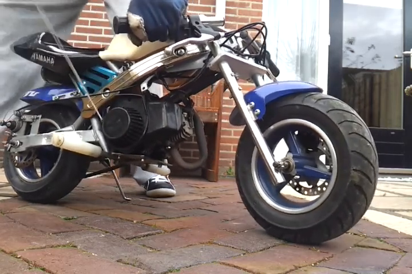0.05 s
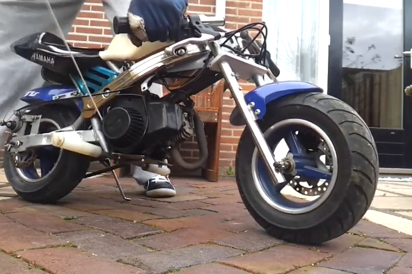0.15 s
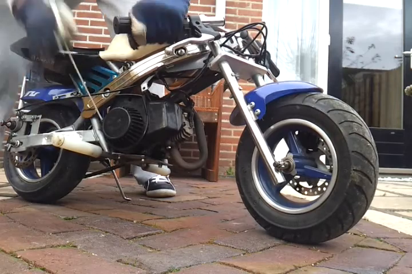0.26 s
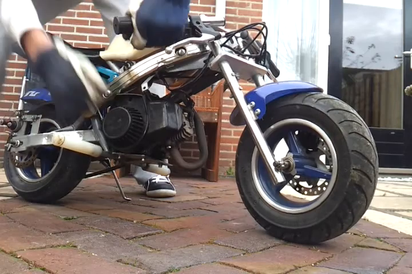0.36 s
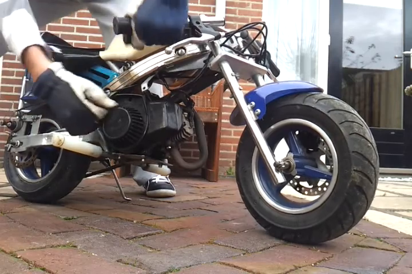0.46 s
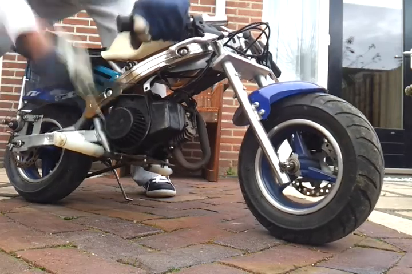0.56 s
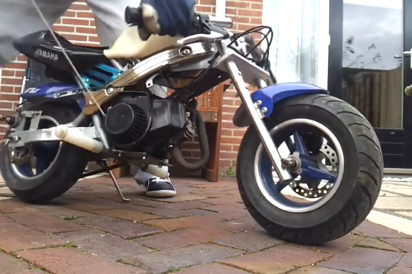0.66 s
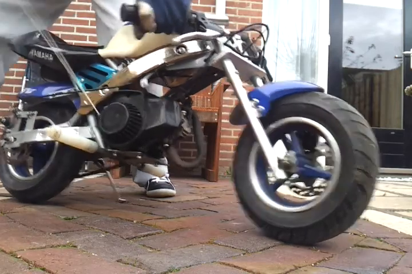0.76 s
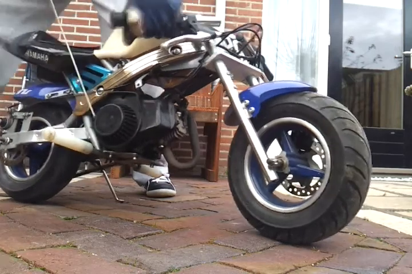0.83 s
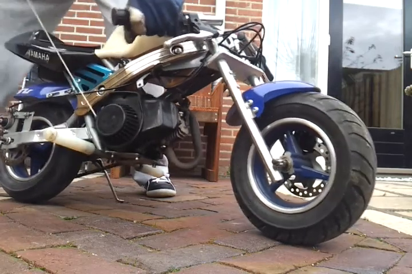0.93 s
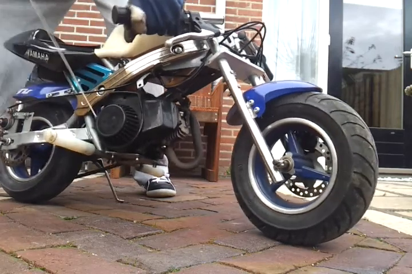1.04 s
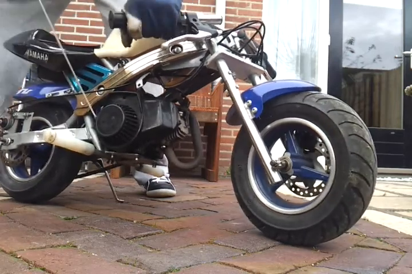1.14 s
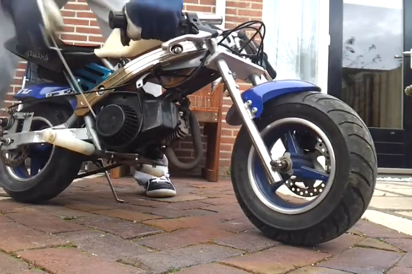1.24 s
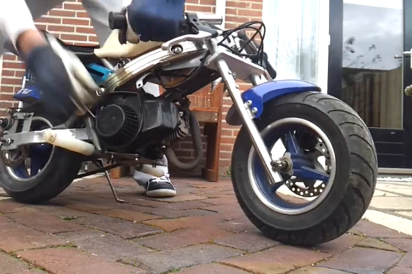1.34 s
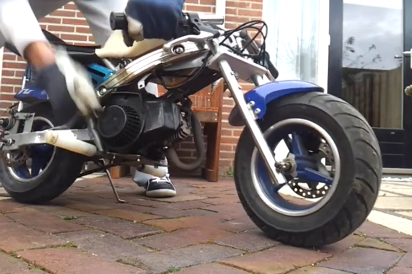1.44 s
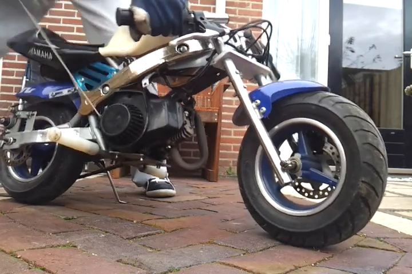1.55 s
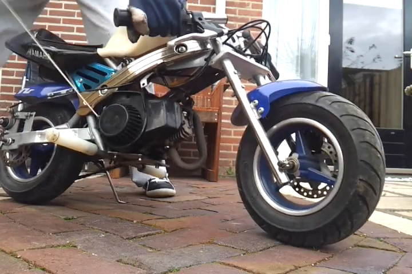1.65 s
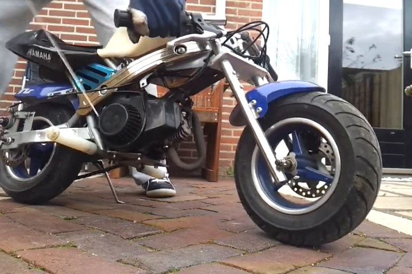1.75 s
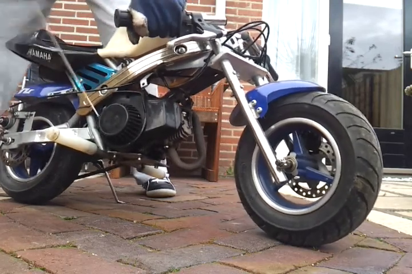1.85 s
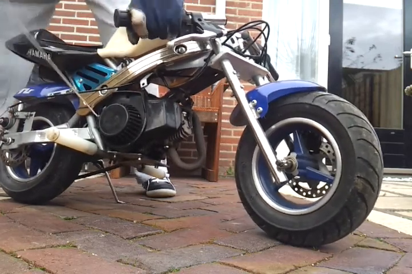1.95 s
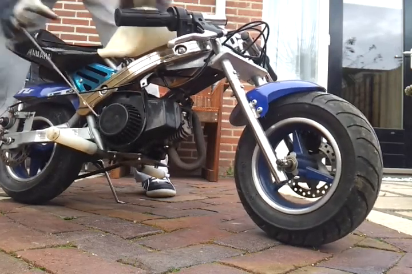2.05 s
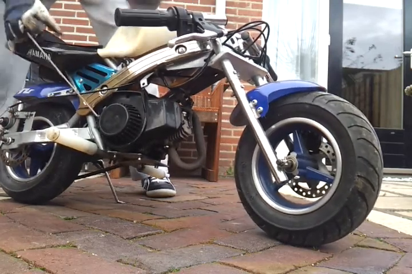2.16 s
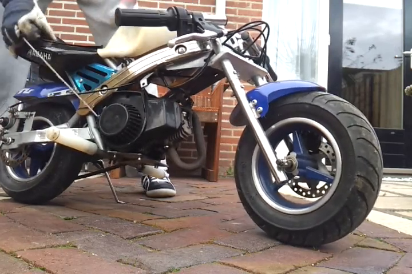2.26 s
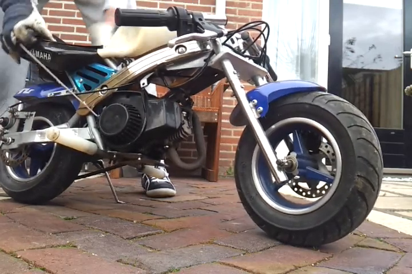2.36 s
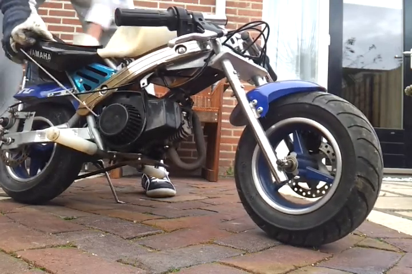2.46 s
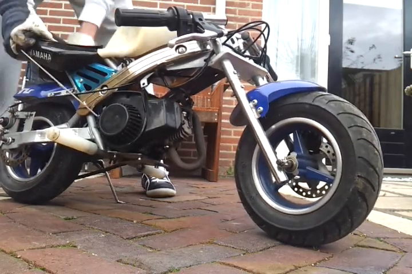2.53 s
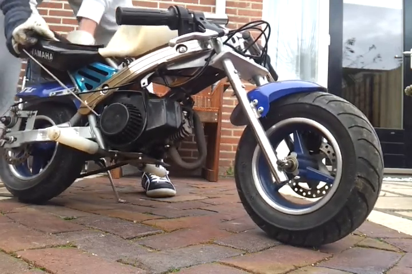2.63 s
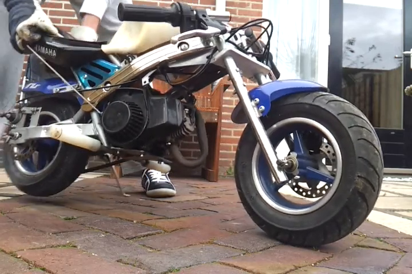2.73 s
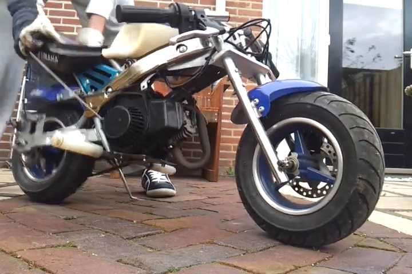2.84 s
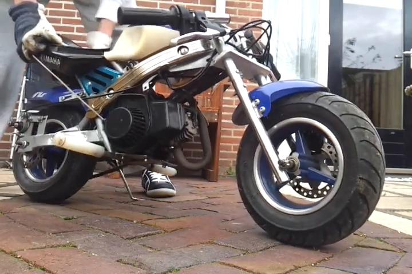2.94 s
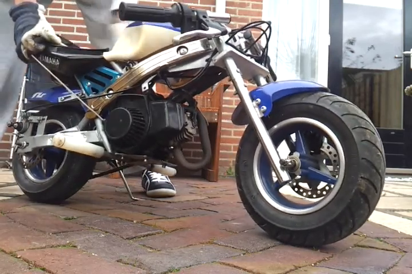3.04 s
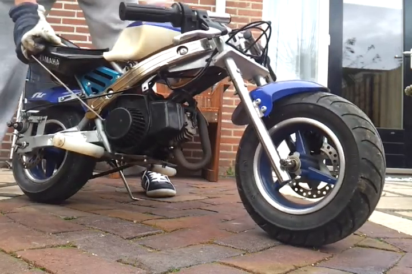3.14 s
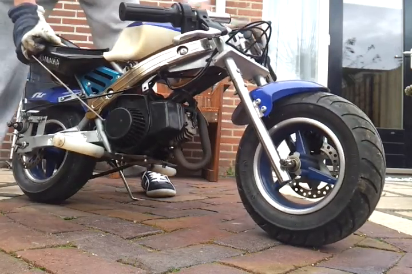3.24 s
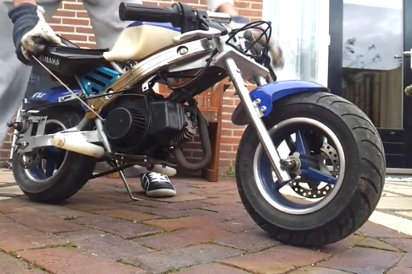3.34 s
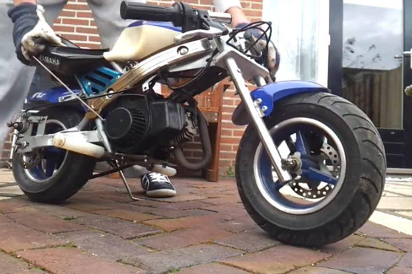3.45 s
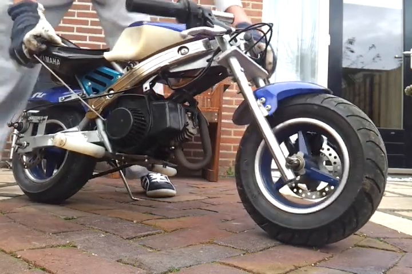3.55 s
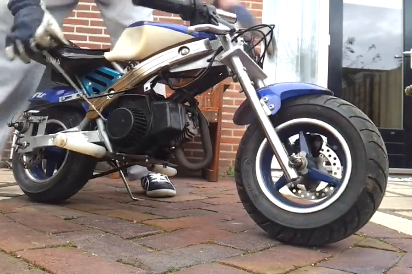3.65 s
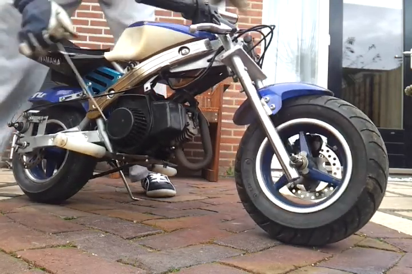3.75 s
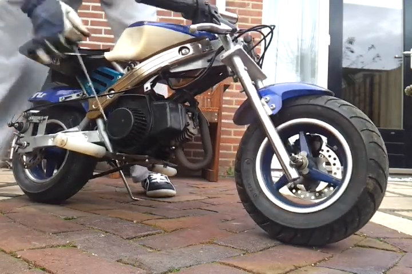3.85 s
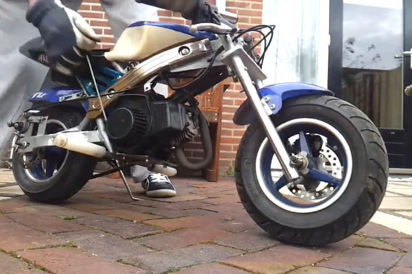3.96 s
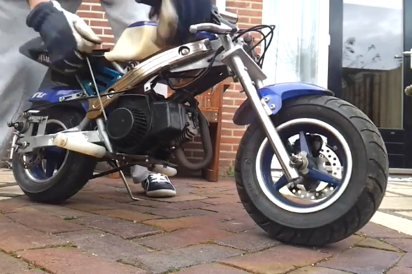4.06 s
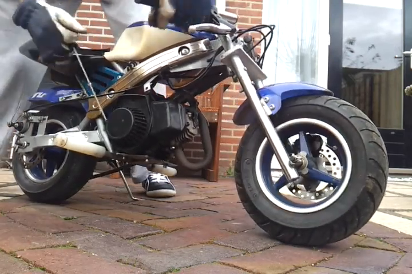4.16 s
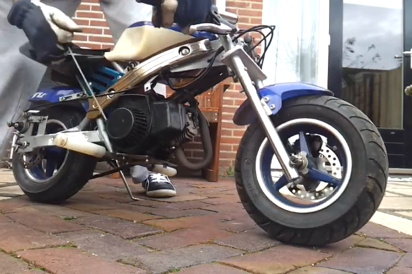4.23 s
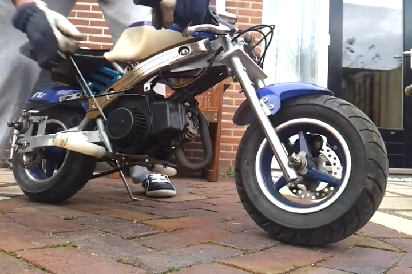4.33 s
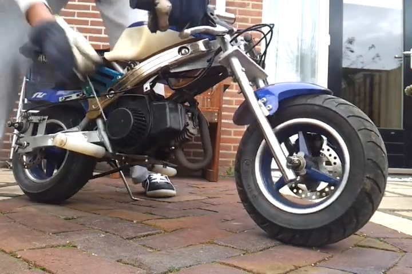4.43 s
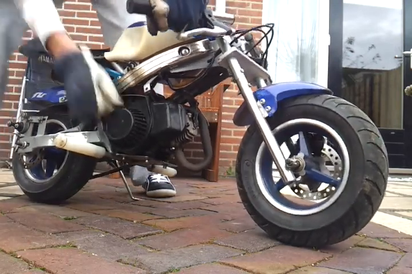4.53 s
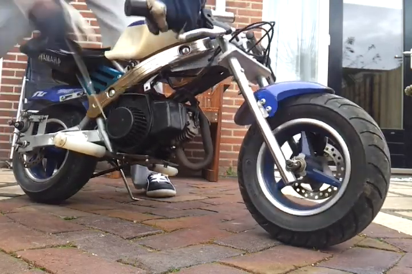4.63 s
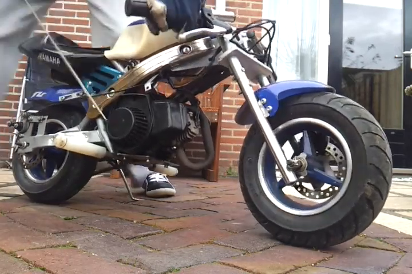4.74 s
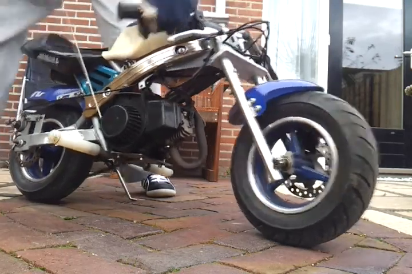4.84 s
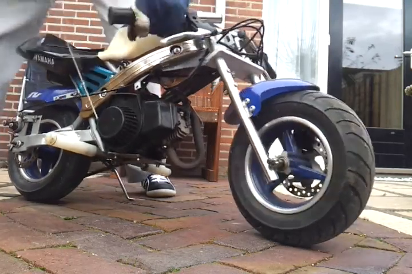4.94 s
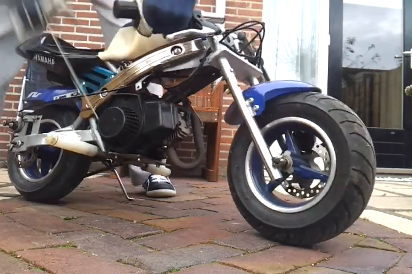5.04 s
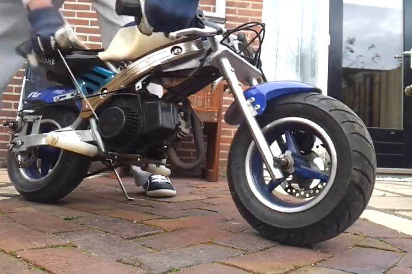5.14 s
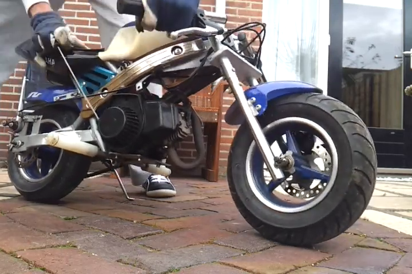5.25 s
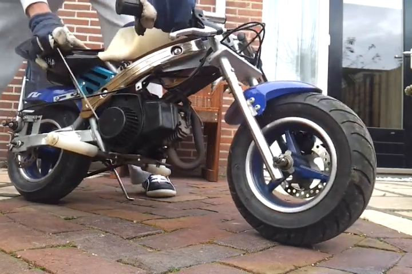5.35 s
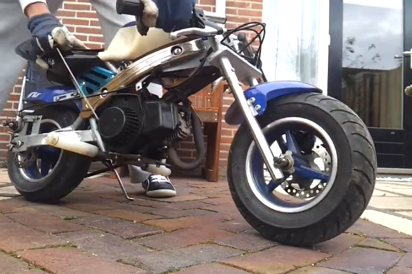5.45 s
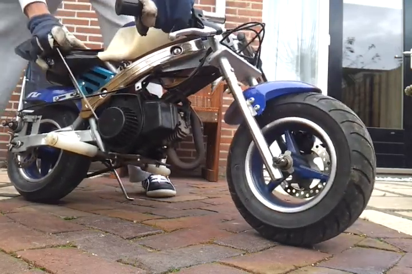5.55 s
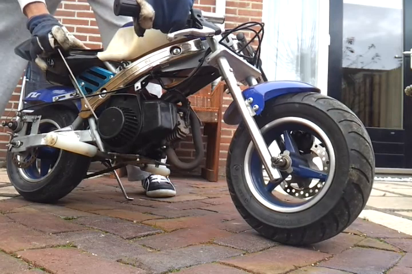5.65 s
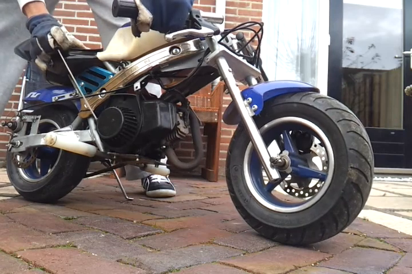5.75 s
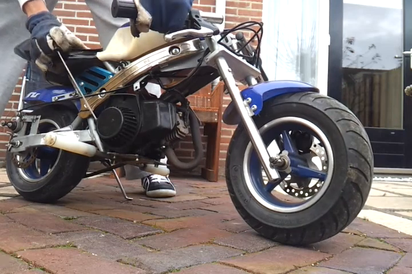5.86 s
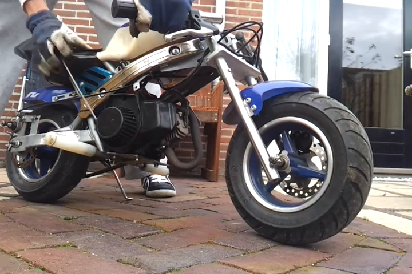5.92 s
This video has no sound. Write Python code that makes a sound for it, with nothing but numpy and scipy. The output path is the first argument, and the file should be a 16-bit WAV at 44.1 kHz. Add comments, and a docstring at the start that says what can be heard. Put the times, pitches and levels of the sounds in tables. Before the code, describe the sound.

A mini motorbike's two-stroke engine is pull-started in a quiet yard, close to a slightly overloading microphone. At the start a pull runs out in a few hollow puffs and a metallic rattle. The starter handle clacks around 0.5 seconds. Two more pulls, at 0.7 and 1.5 seconds, each bring a ratcheting whirr, a thin rope squeak, sharp cracks and a quick run of puffs that slows without firing. From about 2.6 to 4.4 seconds it is quieter: scuffs, small knocks, a metal clank and faint wind bumps as the bike is shifted. Clicks build up to another pull at 4.7 seconds, and the engine catches at once, racing with a raspy, high buzz, exhaust barks and ringing metallic clatter. It slows from about 5.1 seconds and by 5.6 has sunk to a rattling, uneven idle that runs until the end at 6 seconds.

```python
"""A pocket bike's small two-stroke is pull-started on a brick yard, close to an overloading microphone.
A first pull runs out; two more (0.7 s, 1.5 s) whirr the pulley and only turn the engine over in puffs.
The bike is shifted with scuffs and knocks, wind thumps the microphone, and the rider pulls again (4.7 s).
The engine catches and races: exhaust pulses ring the pipe, piston slap rings the fins.
By 5.6 s it has sunk to a rattling idle that fires only every few turns."""
import sys
import numpy as np
from scipy import signal
from scipy.io import wavfile

SR = 44100
rng = np.random.default_rng(int(sys.argv[2]) if len(sys.argv) > 2 else 0)


def wav_out(sig):
    """Save sig, one row per channel (or a flat mono array), as 16-bit PCM at SR to the path in sys.argv[1]."""
    wavfile.write(sys.argv[1], SR, np.round(np.clip(np.atleast_2d(sig).T, -1, 1) * 32767).astype(np.int16))


N = 264159
TIME = np.arange(N) / SR
TAIL = TIME[:SR // 2]  # time axis of one short event
RACING_HZ = 89.8

# turns on which the mixture fires: (time [s], bark level [dB], silencer level [dB])
FIRINGS = [(4.760, -5, -25), (4.790, -16, -9.5), (4.838, -12, -11.5), (4.883, -7, -4.5), (4.962, -13, -13),
           (5.010, -8, -6.5), (5.105, -15, -2), (5.267, -7, -6), (5.403, -4.5, -6), (5.523, -2, -11),
           (5.592, -5.5, -14), (5.663, -7.5, -9.5), (5.750, -8.5, -7), (5.835, -3, -11), (5.905, -8, -8),
           (5.974, -7, -7.5)]
# rope pulls: (pawl bite [s], stroke end [s], spin-down [s], whirr level [dB], bite level [dB])
PULLS = [(-.25, -.04, 0.091, -14, 0), (0.655, 0.926, 0.042, -10, 6.5), (1.545, 1.72, 0.089, -10.5, 6.5),
         (4.681, 4.74, .05, -10.5, 3)]
# starter cover modes: (frequency [Hz], width [Hz], level [dB])
COVER_MODES = [(519, 73, 4), (893, 120, 3), (1094, 170, -1.5), (1523, 310, 0), (2283, 170, -10.5),
               (3600, 920, -14.5), (6100, 1130, -3.5)]


def engine():
    """Each turn gives an exhaust pulse, a rush of gas and a piston slap that rings the fins."""
    # exhaust, gas rasp and metal clatter spectra: (frequency [Hz], level [dB])
    exhaust_spectrum = [(25, -11.5), (85, -19), (130, -9), (250, -3), (350, -7.5), (480, 0.5), (620, -5.5),
                        (720, 0), (850, -14.5), (1100, -35.5), (2000, -21.5), (4000, -43)]
    rasp_spectrum = [(300, -28.5), (700, -2.5), (950, 4), (1100, -2.5), (1380, 0.5), (1650, -4),
                     (2000, -2.5), (2500, -1), (3200, -6.5), (4500, -8), (7000, -30)]
    clatter_spectrum = [(1500, -17), (3000, -13.5), (4000, -4.5), (4900, -6), (5400, -6), (6300, 3),
                        (7000, -2), (7600, -8), (9000, -24)]
    # exhaust pipe and cylinder fin modes: (frequency [Hz], width [Hz], level [dB])
    pipe_modes = [(277, 30, -6), (539, 10, 11)]
    fin_modes = [(5344, 130, 0), (5940, 170, -5), (6300, 720, -8), (3900, 24, -23), (1426, 240, -7.5)]
    catch_s, catch_rise_s = 4.735, 0.027
    rasp_db_per_hz, clatter_db_per_hz = 0.22, 0.0751  # both fade as the crank slows
    speed_hz = crank_speed()
    turns = np.cumsum(speed_hz) / SR
    slowed_hz = (RACING_HZ - speed_hz) * (TIME > catch_s + catch_rise_s)

    pulses = np.diff(np.floor(turns), prepend=0) * flutter(per_s=70, depth_db=6.5)
    rush = evened(noise() * (.45 + np.exp(-(turns % 1) / .35)))
    pipe = evened(body(pulses + .03 * rush, pipe_modes) * flutter(per_s=16, depth_db=4))
    gas = 1.07 * evened(coloured(rush + 0.39 * evened(pulses), exhaust_spectrum)) + .4 * pipe
    rasp = 1.42 * evened(coloured(rush * flutter(per_s=250, depth_db=1.5), rasp_spectrum))

    slap_turns = turns + .5
    slaps = np.diff(np.floor(slap_turns), prepend=0) * flutter(per_s=70, depth_db=2.5)
    ticks = .6 * body(slaps, fin_modes)
    hiss = noise() * (1 + 0.25 * np.exp(-(slap_turns % 1) / 0.73))
    clatter = 1.02 * evened(coloured(hiss, clatter_spectrum)) + .5 * body(hiss, fin_modes) + ticks

    running = gas * gain_of(-10.5)
    running += rasp * gain_of(-12 - rasp_db_per_hz * slowed_hz)
    running += clatter * gain_of(-11 - clatter_db_per_hz * slowed_hz)
    return exhaust_note(turns, speed_hz) + running * ramp(catch_s, catch_rise_s)


def crank_speed():
    """Turns per second: each firing kicks the crank, which then coasts to the next."""
    # crank speed trend: (time [s], speed [Hz])
    trend = [(4.70, 35), (4.80, 84), (4.86, 90), (5.05, 87), (5.2, 77), (5.33, 72.5), (5.5, 62),
             (5.62, 56.5), (6.0, 56.5)]
    surge_hz, rise_share = 2.1, .25
    fired_s = [row[0] for row in FIRINGS]
    cycle = np.interp(TIME, fired_s, np.arange(len(fired_s))) % 1
    surge = np.interp(cycle, [0, rise_share, 1], [-1, 1, -1])
    return np.interp(TIME, *np.transpose(trend)) + surge_hz * surge


def exhaust_note(turns, speed_hz):
    """Sputtering overtones of the crank; the strongest sink as the engine slows."""
    # crank overtones: (order [1], level [dB])
    orders = [(2, -3), (3, -4), (4, -1), (5, -4), (6, 2), (7, -3), (8, -8), (9, -9), (10, -9), (11, -10)]
    # note envelope: (time [s], level [dB])
    envelope = [(4.76, -23), (4.88, -18), (5.06, -16), (5.17, -11), (5.48, -10.5), (5.6, -15),
                (5.99, -14.5)]
    racing_centre_hz, floor_hz, sag_hz_per_hz, log_width = 556, 261, 10.36, 0.14
    centre_hz = np.maximum(racing_centre_hz - sag_hz_per_hz * (RACING_HZ - speed_hz), floor_hz)
    note = np.zeros(N)
    for order, db in orders:
        emphasis = 0.42 + np.exp(-(np.log(order * speed_hz / centre_hz) / log_width) ** 2)
        sputter = flutter(per_s=30, depth_db=2.6)
        note += gain_of(db) * emphasis * sputter * np.cos(2 * np.pi * order * turns + rng.random() * 2)
    return note / np.std(note[TIME > envelope[0][0]]) * level(envelope)


def firings():
    """A burning charge barks at the port and leaves the silencer humming."""
    # (frequency [Hz], width [Hz], level [dB])
    bark_modes = [(2570, 81, 0), (2270, 84, -4.5)]
    out = np.zeros(N)
    for s, bark_db, silencer_db in FIRINGS:
        blast = body(noise(len(TAIL)), bark_modes) * dying(t60_s=0.15, rise_s=0.001)
        bark = 0.97 * ring(hz=2581, t60_s=0.06, rise_s=0.0012) + .5 * blast
        add(out, s, gain_of(bark_db + 4.5) * bark)
        add(out, s, gain_of(silencer_db + 13.5) * ring(hz=745.2, t60_s=0.12, rise_s=0.012))
    return out


def cranking():
    """Each unfired compression ends in a hollow puff that rings the pipe and shakes the cover."""
    # (frequency [Hz], level [dB])
    air_spectrum = [(40, -21.5), (90, -16), (150, 6.0), (520, -3.5), (900, -11), (2500, -20.5)]
    free_hz, sag_hz, sag_db = 253.4, 104, 12  # sag at full drag
    pipe = (0.16 * ring(hz=265, t60_s=0.061, rise_s=0.0036)
            + 0.37 * ring(hz=460.5, t60_s=.1, rise_s=0.0038)
            + 0.34 * ring(hz=544, t60_s=0.15, rise_s=0.0045))
    out = np.zeros(N)
    for s, run_db, drag in compressions():
        db = run_db - 1.5 - sag_db * drag
        hz = free_hz - sag_hz * drag
        air = evened(coloured(noise(len(TAIL)), air_spectrum)) * dying(t60_s=0.17, rise_s=.006)
        thud = ring(hz, t60_s=0.037, rise_s=0.0038) + 0.15 * ring(hz / 2, t60_s=0.12, rise_s=0.005)
        add(out, s, gain_of(db) * (2.28 * thud + pipe + .5 * air))
        shake = body(noise(len(TAIL)), COVER_MODES) * dying(t60_s=.035, rise_s=.001)
        add(out, s + .005, gain_of(db - 4) * shake)
    return out


def compressions():
    """Rows (time [s], level [dB], drag [0..1]): drag grows each turn and stretches the gaps."""
    # unfired runs of the crank: (first [s], last [s], compressions [count], level [dB])
    runs = [(.001, .204, 4, -3.5), (.710, 1.090, 10, 1), (1.615, 1.932, 8, -.5)]
    drag_ratio, stretch = .62, 1.86
    rows = []
    for first_s, last_s, count, db in runs:
        drag = drag_ratio ** np.arange(count)[::-1]
        elapsed = np.cumsum(1 + stretch * drag)
        times_s = np.interp(elapsed, elapsed[[0, -1]], [first_s, last_s])
        rows += zip(times_s, [db] * count, drag)
    return rows


def starter():
    """The pulley whirrs and chatters in its cover, the rope sings, the pawls ping as the crank stops."""
    # pulley spectrum: (frequency [Hz], level [dB])
    whirr_spectrum = [(120, -14.5), (250, -3), (400, -5), (520, 5), (640, -13), (780, 3), (1100, -10.5),
                      (1400, 1.5), (2000, -12.5), (2600, -2), (3500, -6.5), (5000, -5), (6300, 0),
                      (7600, -12), (9500, -33)]
    # rope singing in its guide: (time [s], length [s], level [dB], start [Hz], end [Hz])
    squeals = [(0.658, 0.051, -9, 6290, 6960), (1.56, 0.062, -9, 6990, 6860),
               (1.737, 0.058, -15.5, 6870, 6200), (4.702, 0.06, -8, 6530, 6910)]
    # a pawl drops off its tooth: (time [s], level [dB])
    pawl_drops = [(.138, -10), (1.142, -21), (1.966, -15)]
    whirr = evened(coloured(noise() * flutter(per_s=350, depth_db=4.5), whirr_spectrum))
    clicks = grains(per_s=260, spread_db=2.5)
    chatter = evened(coloured(clicks, whirr_spectrum)) + 0.55 * body(clicks, COVER_MODES)
    teeth = grains(per_s=55, spread_db=2)
    tooth_click = body(noise(len(TAIL)), COVER_MODES) * dying(t60_s=.018)
    ratchet = evened(signal.oaconvolve(teeth, tooth_click)[:N])
    strokes = sum(gain_of(db) * stroke(*timing) for *timing, db, _ in PULLS)
    out = (0.5 * whirr + 0.29 * chatter + 0.2 * ratchet) * lurches() * strokes
    for s, length_s, db, start_hz, end_hz in squeals:
        size = int(length_s * SR)
        song = resonate(noise()[:size], np.linspace(start_hz, end_hz, size), width_hz=57)
        add(out, s, gain_of(db) * evened(song) * signal.windows.tukey(size, .4))
    for s, db in pawl_drops:
        ping = ring(hz=6060, t60_s=0.073, rise_s=0.00083) + 0.66 * ring(hz=6440, t60_s=0.063)
        add(out, s, gain_of(db) * ping)
    return out


def stroke(bite_s, end_s, spin_down_s):
    """Gain of one pull: slack is taken up, the pulley grips and spins down, the spring rewinds."""
    slack_s, grip_s, rewind_s = 0.16, 0.02, 0.6
    slack = gain_of(-27.5) * ramp(bite_s - slack_s, slack_s / 2)
    grip = ramp(bite_s, grip_s)
    spin = np.exp(-(np.maximum(TIME - end_s, 0) / spin_down_s) ** 2)
    rewind = gain_of(-19) * (1 - ramp(end_s, rewind_s))
    return (1 - grip) * slack + grip * np.maximum(spin, rewind)


def lurches():
    """Gain of the pulley: it chatters harder as the crank jerks over each compression."""
    out = np.ones(N)
    for s, _, drag in compressions():
        add(out, s, 0.62 * (1 - drag) * dying(t60_s=0.066, rise_s=.002))
    return out


def knocks():
    """Cracks of handle and pawls ring the plastic cover; harder blows rattle and ring the frame."""
    # starter handle and loose parts: (time [s], level [dB], brightness [dB])
    hits = [(.464, -11.5, 7), (.49, -3, -5.5), (.507, -7.5, -6), (.553, -20, 15), (.625, -7, -4),
            (.638, -4, 0), (.834, 11.5, 3.5), (1.416, -12.5, 9), (1.454, 3.5, -7), (1.468, -1.5, -2),
            (1.525, -3.5, 0.5), (1.742, 5, 5), (1.806, 3, -4), (2.053, -19.5, 0), (2.09, -13, 2.5),
            (2.599, -28, 7.5), (3.086, -18, -3), (3.203, -27, 2.5), (3.333, -36, -2), (3.464, -26.5, 4.5),
            (4.253, -23, -11), (4.291, -26, -10), (4.355, -28, -8), (4.404, -14.5, -7), (4.428, -14, -4),
            (4.452, -13, -3), (4.6, -25.5, 11), (4.636, -12.5, -12), (4.65, -10.5, -1.5), (4.67, -5, -1),
            (4.696, 2.5, 0.5)]
    # blows on the frame: (time [s], rattle level [dB], rattle t60 [s], ring level [dB])
    blows = [(0.154, -15.5, 0.16, -31), (1.220, -9, .09, -29), (2.738, -22, 0.078, -47),
             (2.744, -13.5, .11, -23.5)]
    # frame modes: (frequency [Hz], level [dB], t60 [s])
    frame_modes = [(990, -1.5, .17), (1577, -14, .3), (2240, -1, .12), (2215, -16.5, .6), (2800, -3, .13),
                   (2985, -12, .3), (3779, -15, .7), (4064, -15, .35), (4183, -12, .35), (4560, -15, .3),
                   (5383, -15, .3), (6342, -12, .2)]
    # loose steel part: (frequency [Hz], width [Hz], level [dB])
    rattle_modes = [(1026, 85, 4), (1590, 150, -10), (2205, 100, -4.5), (2810, 410, -4.5),
                    (3670, 310, -9.5), (5460, 830, -11), (6300, 290, -7.5)]
    pawl_bright_db, lead_s, sag_db = 4, 0.0087, 6
    doubling_db = 11  # brightness that doubles the decay: metal outrings plastic
    frame = sum(gain_of(db) * ring(hz, t60_s) for hz, db, t60_s in frame_modes)
    bites = [(s, db, pawl_bright_db) for s, *_, db in PULLS if s > 0]
    # the slowing crank jolts the pawls just before each puff
    clacks = [(s - lead_s * drag, run_db - 1.5 - sag_db * drag, pawl_bright_db * drag)
              for s, run_db, drag in compressions()]
    out = np.zeros(N)
    for s, db, bright_db in hits + bites + clacks:
        low_db, top_db = -14 - 0.25 * bright_db, -5 + bright_db
        spectrum = [(100, low_db - 8), (500, low_db + 3), (900, low_db + 5), (1400, low_db + 2.5),
                    (2400, -9), (4000, -5), (5500, top_db + 0.5), (7500, top_db - 5.5)]
        contact = noise(len(TAIL))
        crack = evened(coloured(contact + 0.76 * body(contact, COVER_MODES), spectrum))
        decay = dying(t60_s=0.049 * 2 ** (bright_db / doubling_db)) + 0.018 * dying(t60_s=0.22)
        add(out, s, gain_of(db - 7) * (crack * decay + 0.057 * frame))
    for s, db, t60_s, ring_db in blows:
        rattle = body(noise(len(TAIL)), rattle_modes) + 0.67 * noise(len(TAIL))
        add(out, s, gain_of(db) * rattle * dying(t60_s, rise_s=0.0018) + gain_of(ring_db) * frame)
    return out


def handling_and_wind():
    """Shoes, tyres and clothes scuff; small bumps, creaks and clinks; wind thumps the microphone."""
    # scuffs: (time [s], rise [s], length [s], level [dB])
    scuffs = [(2.6, .01, 0.061, -42.5), (2.688, 0.01, .13, -35), (2.856, .006, 0.04, -39.5),
              (2.95, .003, 0.11, -24), (3.444, 0.012, .03, -41), (3.659, 0.028, .11, -38),
              (4.098, 0.05, 0.22, -41.5), (4.42, .02, .06, -46)]
    # scuff spectrum: (frequency [Hz], level [dB])
    grit_spectrum = [(88, -50), (150, -5.5), (289, -6), (458, 4.5), (626, -6.5), (992, -6), (2040, -14),
                     (2610, -8), (3240, -13.5), (3940, -13), (4420, -13.5), (6340, -6.5), (7600, -18.5),
                     (9880, -38), (16700, -120)]
    # low wind thumps, small bumps, creaks and clinks: (time [s], level [dB], pitch [Hz], t60 [s])
    short_notes = [(2.951, -31, 378, 0.054), (2.99, -34, 536, 0.23), (2.991, -35, 2620, 0.04),
                   (3.04, -26, 4050, .04), (3.089, -32.5, 1680, 0.038), (3.135, -35, 80.6, 0.097),
                   (3.204, -33.5, 69, 0.11), (3.232, -24, 169, 0.022), (3.466, -30, 2370, 0.026),
                   (3.682, -36.5, 497, 0.12)]
    friction = noise() * flutter(per_s=250, depth_db=3.5) + .5 * grains(per_s=240, spread_db=6)
    out = evened(coloured(friction, grit_spectrum)) * sum(scuff(*row) for row in scuffs)
    for s, db, hz, t60_s in short_notes:
        add(out, s, gain_of(db + 4.5) * ring(hz, t60_s, rise_s=0.001))
    return out


def scuff(start_s, rise_s, length_s, db):
    """Gain of one scuff: it eases off along its length, then dies."""
    sag_db, t60_s = 7.5, 0.15
    release_db = 60 * np.maximum(TIME - start_s - length_s, 0) / t60_s
    return ramp(start_s, rise_s) * gain_of(db - sag_db * ramp(start_s, length_s) - release_db)


def walls(x):
    """House front and paving throw back a short scatter."""
    echoes_per_s = 2000
    taps = noise(len(TAIL)) * (rng.random(len(TAIL)) < echoes_per_s / SR)
    taps *= dying(t60_s=0.4, rise_s=0.0047)
    return signal.oaconvolve(x, taps / np.linalg.norm(taps))[:N]


def yard():
    """Faint, steady outdoor rumble and hiss."""
    # background spectrum: (frequency [Hz], level [dB])
    spectrum = [(15, -58), (25, -5), (103, -1), (143, -8.5), (226, -5), (421, -10), (617, -15),
                (783, -11.5), (1680, -18.5), (2090, -22), (2470, -23.5), (5570, -22.5), (7600, -26.5),
                (9880, -71), (16700, -120)]
    return gain_of(-48.5) * evened(coloured(noise(), spectrum))


def gain_of(db):
    """Decibels to amplitude."""
    return 10 ** (np.asarray(db) / 20)


def evened(x):
    """Scaled to rms 1."""
    return x / np.sqrt(np.mean(x ** 2) + 1e-20)


def noise(size=N):
    """White noise."""
    return rng.standard_normal(size)


def grains(per_s, spread_db):
    """Sparse clicks of uneven size."""
    size = gain_of(spread_db * np.minimum(rng.exponential(1, N), 4))
    return evened(size * np.sign(noise()) * (rng.random(N) < per_s / SR))


def flutter(per_s, depth_db):
    """Randomly wandering gain."""
    knots_s = np.arange(0, TIME[-1] + 1, 1 / per_s)
    return gain_of(depth_db * np.interp(TIME, knots_s, noise()[:len(knots_s)]))


def add(mix, s, sound):
    """Mixes a sound in at a time."""
    part = mix[max(round(s * SR), 0):][:len(sound)]
    part += sound[:len(part)]


def ramp(start_s, length_s):
    """Rises from 0 to 1 and holds."""
    return np.clip((TIME - start_s) / length_s, 0, 1)


def level(rows):
    """Gain from (time [s], level [dB]) rows, fading out just outside their span."""
    s, db = np.transpose(rows)
    inside_s = np.minimum(TIME - s[0], s[-1] - TIME)
    return gain_of(np.interp(TIME, s, db)) * np.clip(1 + inside_s / .004, 0, 1)


def coloured(x, spectrum):
    """Minimum-phase filter from (frequency [Hz], level [dB]) rows."""
    hz, db = np.transpose(spectrum)
    bins_hz = abs(np.fft.fftfreq(4096, 1 / SR))
    log_gain = np.log(gain_of(np.interp(np.log(bins_hz + 1), np.log(hz + 1), db)) + 1e-5)
    taps = np.fft.ifft(np.exp(np.conj(signal.hilbert(log_gain)))).real
    return signal.oaconvolve(x, taps[:len(taps) // 2])[:len(x)]


def resonate(x, hz, width_hz):
    """Unity-gain resonance, steady or gliding."""
    carrier = np.exp(2j * np.pi * np.cumsum(hz * np.ones(len(x))) / SR)
    pole = np.exp(-np.pi * width_hz / SR)
    return 2 * (carrier * signal.lfilter([1 - pole], [1, -pole], x / carrier + 1e-18)).real


def body(x, modes):
    """Parallel resonances, scaled to rms 1."""
    return evened(sum(gain_of(db) * resonate(x, hz, width_hz) for hz, width_hz, db in modes))


def dying(t60_s, rise_s=0.00039):
    """Envelope of a blow."""
    return gain_of(-60 * TAIL / max(t60_s, .004)) * (1 - np.exp(-TAIL / rise_s))


def ring(hz, t60_s, rise_s=.0005):
    """One struck mode."""
    return dying(t60_s, rise_s) * np.sin(2 * np.pi * hz * TAIL)


def scene():
    """The bike, its echo and the quiet yard, in mono."""
    near = starter() + cranking() + knocks() + engine() + firings() + handling_and_wind()
    return (near + yard() + gain_of(-12.5) * walls(near))[None]


def record(dry):
    """The microphone overloads and cuts the treble; remaining peaks are rounded off."""
    mic_hz, edge_hz = 7350, 16000
    knee, headroom = .6, .17
    mic_lowpass = signal.firwin(57, mic_hz, window=("kaiser", 7), fs=SR)
    edge_lowpass = signal.firwin(511, edge_hz, window=("kaiser", 9), fs=SR)
    overloaded = 0.77 * np.tanh(dry / 0.73)
    narrow = signal.oaconvolve(overloaded, mic_lowpass[None], "same")
    clipped = np.clip(narrow, -knee, knee)
    rounded = clipped + headroom * np.tanh((narrow - clipped) / headroom)
    return signal.oaconvolve(rounded, edge_lowpass[None], "same")


dry = scene()
out = record(dry)
wav_out(out)
```